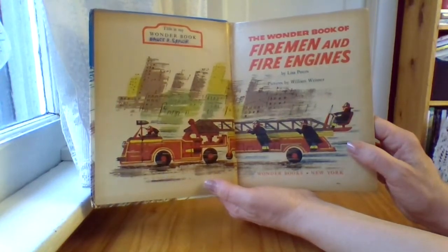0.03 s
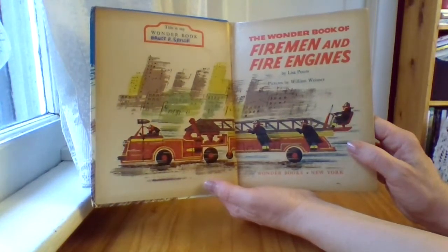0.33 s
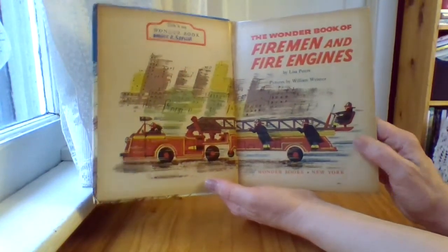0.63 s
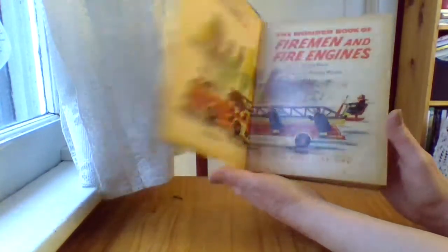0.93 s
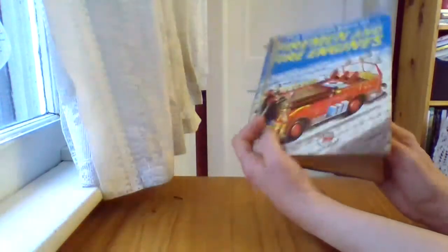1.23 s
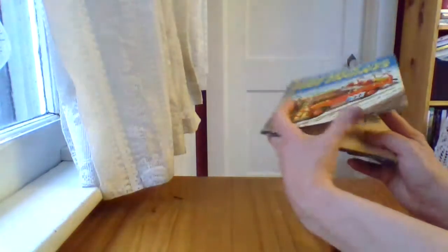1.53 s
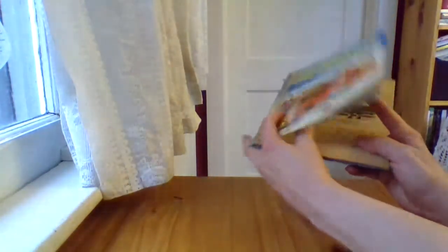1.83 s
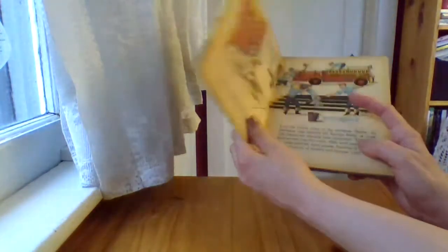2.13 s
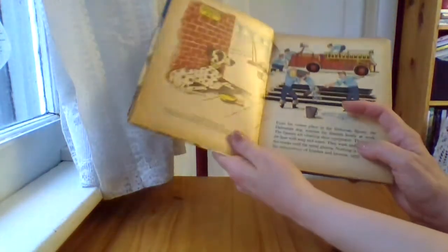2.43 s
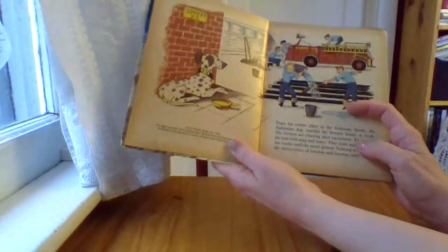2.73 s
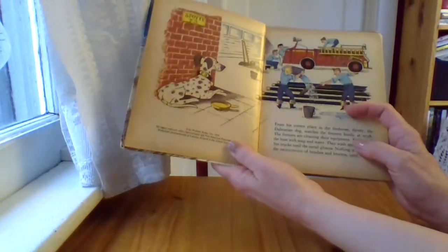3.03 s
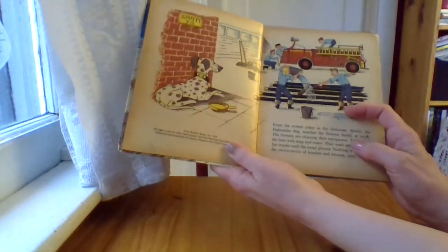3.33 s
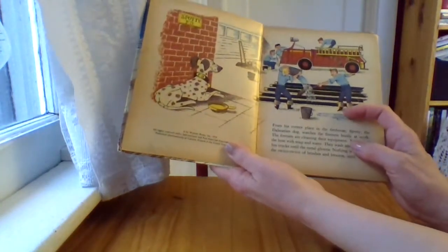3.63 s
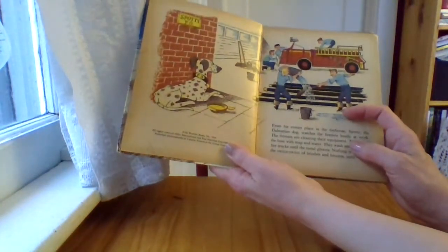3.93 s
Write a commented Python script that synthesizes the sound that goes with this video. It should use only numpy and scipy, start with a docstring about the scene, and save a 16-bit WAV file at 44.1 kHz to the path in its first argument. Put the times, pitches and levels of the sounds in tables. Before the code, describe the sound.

Close up in a quiet room, an old book rustles and closes with a slap, followed by finger knocks on the cover. Pages then crackle and slide as it opens again, over faint hum and hiss.

```python
"""Old hardback in a quiet room

Close to the microphone, an old hardback is handled over a wooden table in a small room.
Hands slide on the boards, the cover slaps shut with a puff of air, fingers knock and set it ringing,
and the book opens again with snaps and scuffs of dry paper.
A low hum, a thin electrical whine, room rumble and microphone hiss run underneath."""
import sys
import numpy as np
from scipy import signal
from scipy.fft import rfft, irfft
from scipy.io import wavfile
from scipy.ndimage import uniform_filter1d

SR = 44100
rng = np.random.default_rng(int(sys.argv[2]) if len(sys.argv) > 2 else 0)


def generate_wav(sig):
    """Save sig (samples, or channels by samples) to the path in sys.argv[1] as 16-bit PCM at SR."""
    pcm = np.round(np.clip(np.atleast_2d(sig).T, -1, 1) * 32767).astype(np.int16)
    wavfile.write(sys.argv[1], SR, pcm)


N = 176400
PAPER_TOP_HZ, SNAP_DECAY_S = 6980, 0.0018


def amp(db):
    """Decibels to amplitude."""
    return 10 ** (np.asarray(db) / 20)


def unit(x):
    """Scale to rms 1."""
    return x / np.sqrt(np.mean(x ** 2))


def burst(envelope):
    """Noise under an envelope, with energy 1."""
    x = rng.standard_normal(len(envelope)) * envelope
    return x / np.sqrt(np.sum(x ** 2))


def seconds(size=N):
    """Time axis for size samples."""
    return np.arange(size) / SR


def add(out, start_s, x):
    """Mix x into out from start_s on."""
    i = int(start_s * SR)
    out[i:i + len(x)] += x[:N - i]


def cut(x, hz, kind, order=2):
    """Butterworth low-pass or high-pass."""
    return signal.sosfilt(signal.butter(order, hz, kind, fs=SR, output="sos"), x)


def colour(x, points, size=8192):
    """Minimum-phase filter through (freq_hz, gain_db) points."""
    hz, db = np.array(points).T
    bin_hz = np.arange(size // 2 + 1) * SR / size
    log_gain = np.log(amp(np.interp(np.log(bin_hz + 1), np.log(hz), db)))
    cepstrum = irfft(log_gain)
    cepstrum[1:size // 2] *= 2
    cepstrum[size // 2 + 1:] = 0
    response = irfft(np.exp(rfft(cepstrum)))
    return signal.fftconvolve(x, response)[:len(x)]


def drift(rate_hz):
    """Smooth random wander with rms 1."""
    hold = int(SR / rate_hz)
    steps = np.repeat(rng.standard_normal(N // hold + 1), hold)
    return unit(uniform_filter1d(uniform_filter1d(steps, hold), hold)[:N])


def fade(t, t60_s):
    """Decay of 60 dB in t60_s."""
    return np.exp(-np.log(1000) * t / t60_s)


def ring(t, hz, t60_s):
    """One decaying mode."""
    return np.sin(2 * np.pi * hz * t) * fade(t, t60_s)


def contact(decay_s, crackle_share):
    """A sharp impulse and the dying crackle of paper fibres behind it."""
    x = np.sqrt(crackle_share) * burst(np.exp(-seconds(2048) / decay_s))
    x[0] += np.sqrt(1 - crackle_share)
    return x


def friction(spread_db, grains_per_s=900):
    """Smooth rubbing noise with fibres catching at random."""
    smooth = rng.standard_normal(N)
    catches = rng.random(N) < grains_per_s / SR
    sign = np.sign(rng.standard_normal(N))
    strength = amp(spread_db * np.minimum(rng.exponential(size=N), 4))
    return unit(smooth + amp(-4) * unit(catches * sign * strength))


def background(hum_hz=72.75, hum_db=-46.5, floor_db=-53):
    """Room tone: a wavering hum, steady electrical tones, rumble and microphone hiss."""
    # steady hum and whine: pitch_hz, level_db
    tones = [(111, -65), (180, -69.5), (1019, -67.5), (8000, -70.5), (10187, -77.5), (10904, -75.5),
             (11588, -76)]
    # spectrum of room rumble and microphone hiss: freq_hz, gain_db
    floor_colour = [(15, -5.5), (30, -2), (48, -5), (95, -8.5), (140, -16), (210, -20.5), (320, -27),
                    (520, -33), (850, -31.5), (1600, -35), (2600, -36), (5000, -38), (9000, -37.5),
                    (15500, -38.5)]
    t = seconds()
    hum_gain = amp(hum_db + 0.64 * drift(9.4))
    hum = hum_gain * unit(np.sin(2 * np.pi * hum_hz * t + 0.047 * drift(7.7)))
    whine = sum(amp(db) * unit(np.sin(2 * np.pi * (hz * t + rng.random()))) for hz, db in tones)
    floor = amp(floor_db) * unit(colour(rng.standard_normal(N), floor_colour))
    return hum + whine + floor


def room(direct, t60_s=0.29, delay_s=0.005, tail_db=-12.5):
    """Near walls put a short diffuse tail behind the direct sound."""
    decay = fade(seconds(22050), t60_s)
    low = cut(burst(decay), 2840, "low")
    high = cut(burst(decay), 2500, "high")
    tail = np.concatenate([np.zeros(int(delay_s * SR)), low + high])
    return direct + amp(tail_db) * signal.fftconvolve(direct, tail)[:N]


def slides(attack_s=0.026, release_s=0.018):
    """Hands and pages slide unevenly: paper hisses, the boards answer with a duller rub."""
    # sliding strokes: start_s, length_s, hiss_db, rub_db
    strokes = [(0.147, 0.076, -70.5, -71.5), (0.58, 0.058, -61, -61), (0.759, 0.18, -62.5, -64),
               (0.965, 0.16, -58, -57.5), (1.134, 0.18, -62, -65), (1.344, 0.084, -59, -66),
               (1.431, 0.053, -59.5, -55.5), (1.494, 0.09, -67, -66.5), (1.734, 0.22, -66.5, -68.5),
               (1.922, 0.21, -60.5, -70), (2.146, 0.15, -59, -64), (2.303, 0.18, -63.5, -71),
               (2.498, 0.29, -68, -73), (2.977, 0.11, -64, -65)]
    # spectrum of sliding paper: freq_hz, gain_db
    hiss_colour = [(800, -37), (2200, 5), (4000, 3), (6500, 6), (8700, 3.5), (10500, -8.5), (15000, -13)]
    # spectrum of rubbed boards: freq_hz, gain_db
    rub_colour = [(80, -13.5), (200, 1), (450, -3.5), (780, -2), (1300, 0.5), (2600, -7), (9000, -16.5)]
    t, hiss_gain, rub_gain = seconds(), 0, 0
    for start_s, length_s, hiss_db, rub_db in strokes:
        attack = np.clip((t - start_s) / attack_s, 0, 1)
        release = np.exp(-np.maximum(t - start_s - length_s, 0) / release_s)
        hiss_gain += amp(hiss_db) * attack * release
        rub_gain += amp(rub_db) * attack * release
    hiss = unit(colour(friction(spread_db=-2), hiss_colour))
    rub = unit(colour(friction(spread_db=4), rub_colour))
    flutter = amp(2 * drift(90))
    return flutter * (hiss * hiss_gain + rub * rub_gain)


def page_crackle(ticks_per_s=55, spread_db=2.5):
    """Tiny bright ticks as the fibres of bent pages let go at random."""
    # spells of crackling: start_s, length_s, level_db
    spells = [(.8, .39, -63), (2.52, .2, -62)]
    t = seconds()
    slips = rng.random(N) < ticks_per_s / SR
    ticks = slips * amp(spread_db * np.clip(rng.standard_normal(N), -2, 2))
    tick_decays = signal.lfilter([1], [1, -np.exp(-1 / (SNAP_DECAY_S * SR))], ticks)
    grains = cut(rng.standard_normal(N) * tick_decays, 5000, "high", order=3)
    gate = sum(amp(db) * ((t > start_s) & (t < start_s + length_s)) for start_s, length_s, db in spells)
    return gate * unit(cut(grains, PAPER_TOP_HZ, "low", order=4))


def page_sweep(peak_s=2.08, width_s=0.035, level_db=-58.5):
    """An airy swell as one page slips off the next."""
    swell = np.exp(-0.5 * ((seconds() - peak_s) / width_s) ** 2)
    air = cut(cut(rng.standard_normal(N), 5850, "high"), PAPER_TOP_HZ, "low")
    return amp(level_db) * swell * unit(air)


def cover_swish(width_hz=1100):
    """The cover drags over skin: smooth friction with a narrow band that climbs as it gathers speed."""
    # course of the drag: time_s, level_db, centre_hz
    drag = [(0.661, -76, 5700), (0.699, -53.5, 5800), (.728, -50, 5920), (.755, -52.5, 6900),
            (.81, -64, 7230), (.87, -80, 7500)]
    # spectrum of the broad friction: freq_hz, gain_db
    body_colour = [(400, -7), (1100, -18), (1500, 4.5), (1900, -6), (4300, -0.5), (8300, -2.5),
                   (12000, -18)]
    t = seconds()
    time_s, level_db, centre_hz = np.array(drag).T
    carrier = np.cos(2 * np.pi * np.cumsum(np.interp(t, time_s, centre_hz)) / SR)
    band = unit(cut(rng.standard_normal(N), width_hz / 2, "low") * carrier)
    body = unit(colour(rng.standard_normal(N), body_colour))
    envelope = np.interp(t, time_s, amp(level_db), left=0, right=0)
    return envelope * (amp(-3.5) * band + amp(-4) * body)


def hinge_pop(start_s=0.6113):
    """The hinge gives with a dull, well damped pop as the cover starts to move."""
    # modes of the spine: pitch_hz, t60_s, level_db
    modes = [(660, 0.017, -37), (1310, 0.013, -36.5)]
    out, t = np.zeros(N), seconds(4096)
    add(out, start_s, sum(amp(db) * ring(t, hz, t60_s) for hz, t60_s, db in modes))
    return out


def palm_bumps(low_hz=125, high_hz=199):
    """Soft, dull thumps as the book settles against the palms."""
    # thumps: start_s, gain_db
    thumps = [(1.486, 3), (1.635, -1), (1.78, -4.5), (2.423, -2.5), (3.041, 1.5)]
    out, t = np.zeros(N), seconds(8192)
    for start_s, gain_db in thumps:
        push = burst(np.sqrt(t) * fade(t, t60_s=0.1))
        add(out, start_s, amp(gain_db) * cut(cut(push, low_hz, "high"), high_hz, "low"))
    return out


def page_scuffs():
    """Page edges catch and let go in short showers of tiny slips."""
    # catches: start_s, length_s, gain_db, low_hz
    scuffs = [(1.079, 0.0047, -12, 6900), (1.12, 0.0093, -19, 3150), (1.454, 0.009, -15.5, 3940),
              (1.648, 0.0064, -15.5, 3730), (1.768, 0.0039, -14.5, 3850), (1.776, .012, -18, 3530),
              (1.894, 0.005, -21.5, 3000), (2.234, 0.0035, -15, 5200), (2.242, 0.012, -10, 4800),
              (2.43, 0.0066, -12, 4550), (2.601, 0.0035, -18, 4500), (2.6368, 0.002, -9.5, 4640),
              (2.729, 0.0054, -13, 4900), (2.735, 0.019, -16, 4670), (2.766, 0.011, -17.5, 5300)]
    out, t = np.zeros(N), seconds(4096)
    for start_s, length_s, gain_db, low_hz in scuffs:
        slips = burst(np.sqrt(t) * np.exp(-2.5 * t / length_s))
        edge = cut(slips, low_hz, "high", order=3) + amp(-27) * slips
        add(out, start_s, amp(gain_db) * cut(edge, PAPER_TOP_HZ, "low", order=4))
    return out


def paper_snaps():
    """Dry paper and binding snap: each a bright band over a faint body."""
    # single snaps: start_s, gain_db, low_hz, high_hz
    snaps = [(.839, -23, 2520, 8000), (0.9511, -19, 2730, 5960), (0.993, -7.5, 1800, 2820),
             (1.04, -17, 1490, 3600), (1.145, -20, 2540, 4200), (1.852, -17, 3300, 10300),
             (2.0124, -21.5, 2600, 7500), (2.123, -18.5, 2540, 4370), (2.163, -14.5, 2300, 5300),
             (2.2047, -3.5, 2050, 6740), (2.2765, -12.5, 1400, 4100), (2.2801, -15.5, 1320, 5260),
             (2.358, -20.5, 2000, 8700), (2.4891, -10.5, 2470, 3300), (2.5075, -21.5, 2900, 6100),
             (2.898, -14.5, 2280, 2560), (3.509, -15, 2960, 4400)]
    out = np.zeros(N)
    for start_s, gain_db, low_hz, high_hz in snaps:
        snap = contact(SNAP_DECAY_S, crackle_share=0.45)
        band = cut(cut(snap, low_hz, "high", order=4), high_hz, "low", order=4)
        body = amp(-17) * cut(snap, high_hz, "low")
        add(out, start_s, amp(gain_db) * (band + body))
    return out


def finger_knocks():
    """Each knock clicks and rings the boards; the grip shifts their pitch a little."""
    # fingers on the cover: start_s, ring_db, click_db, click_top_hz, contact_decay_s
    knocks = [(1.080, -11.5, -19, 6000, 0.0026), (1.379, -1.5, -23, 2960, 0.012),
              (1.4088, 0, -7.5, 5200, 0.0027), (1.418, -7, -13, 1590, 0.0022),
              (1.782, -23, -19, 1600, 0.0014), (2.281, -24, -17.5, 2220, 0.015),
              (2.430, -28, -20, 2500, 0.005)]
    # modes of the boards: pitch_hz, t60_s, gain_db
    board_modes = [(241, 0.066, -43.5), (575, 0.0087, -35), (702.4, 0.11, -39), (807, 0.051, -35),
                   (1096, 0.066, -44), (1426, 0.021, -35.5), (1910, 0.033, -58), (2245, 0.028, -36.5)]
    out, t = np.zeros(N), seconds(8192)
    for start_s, ring_db, click_db, top_hz, decay_s in knocks:
        grip = 1 + 0.01 * rng.standard_normal()
        boards = sum(amp(db) * ring(t, hz * grip, t60_s) * rng.choice([-1, 1])
                     for hz, t60_s, db in board_modes)
        onset = 1 - np.exp(-2 * t / decay_s)
        add(out, start_s, amp(ring_db) * boards * onset)
        click = cut(contact(decay_s, crackle_share=1), top_hz, "low")
        add(out, start_s, amp(click_db) * cut(click, 490, "high"))
    return out


def cover_slap(start_s=1.2477, edge_lag_s=0.00095, puff_hz=29.1):
    """The cover lands on the pages, face then edge: a double crack, a thud and a slow wave of air."""
    # spectrum of the crack: freq_hz, gain_db
    crack_colour = [(200, -3.5), (400, -4), (720, -7.5), (1050, -5.5), (1700, -13), (2400, -7), (4200, -16),
                    (5300, -18.5), (6700, -12.5), (9000, -22.5), (12000, -34)]
    # air pressed out between the pages: time_s, level_db
    puff = [(1.22, -72), (1.255, -43), (1.33, -36), (1.392, -37), (1.47, -43.5), (1.54, -61)]
    impacts, t = np.zeros(N), seconds()
    add(impacts, start_s, contact(decay_s=0.001, crackle_share=0.08))
    add(impacts, start_s + edge_lag_s, amp(1.5) * contact(decay_s=0.0028, crackle_share=0.5))
    out = amp(4.5) * colour(impacts, crack_colour)
    thud = amp(-41) * ring(t, hz=218, t60_s=0.1)
    add(out, start_s, thud)
    time_s, level_db = np.array(puff).T
    air_hz = puff_hz * (1 + 0.111 * drift(20.4))
    air = unit(np.sin(2 * np.pi * np.cumsum(air_hz) / SR))
    return out + air * np.interp(t, time_s, amp(level_db), left=0, right=0)


def scene():
    """The book and its reflections over the room tone, at one microphone."""
    handling = hinge_pop() + cover_slap() + finger_knocks() + palm_bumps()
    paper = paper_snaps() + page_scuffs() + page_crackle()
    rubbing = slides() + cover_swish() + page_sweep()
    return (room(handling + paper + rubbing) + background())[None, :]


def record(dry):
    """The recorder cuts the top octave steeply at 15850 Hz."""
    return signal.sosfilt(signal.ellip(10, 0.1, 80, 15850, fs=SR, output="sos"), dry)


dry = scene()
out = record(dry)
generate_wav(out)
```